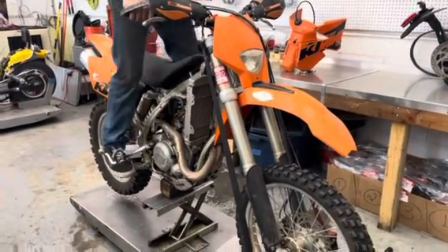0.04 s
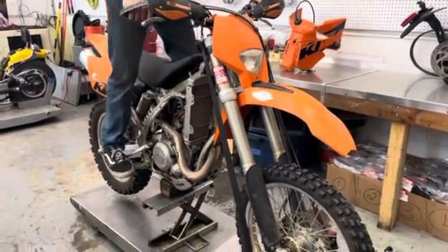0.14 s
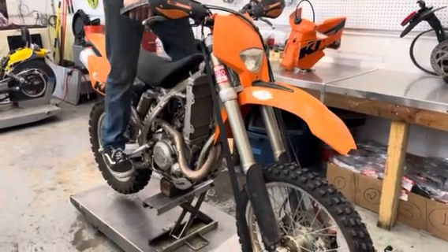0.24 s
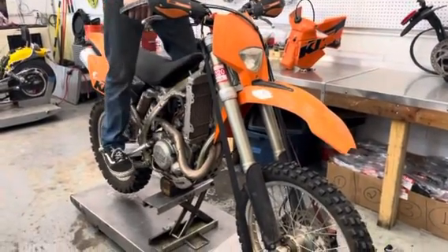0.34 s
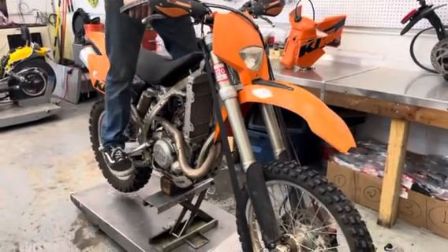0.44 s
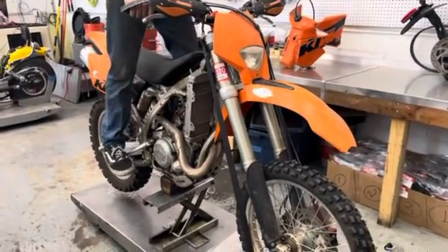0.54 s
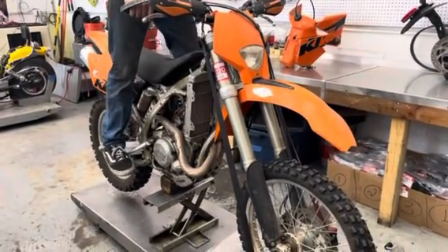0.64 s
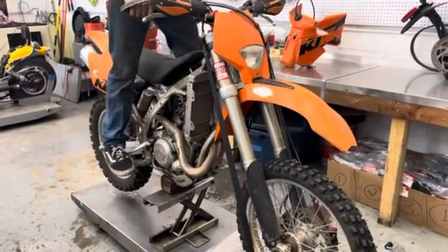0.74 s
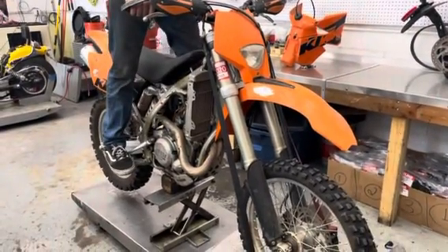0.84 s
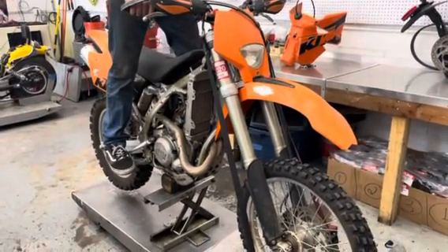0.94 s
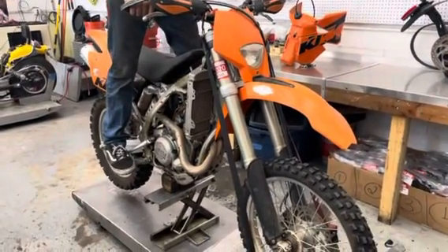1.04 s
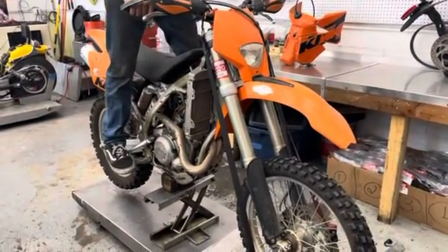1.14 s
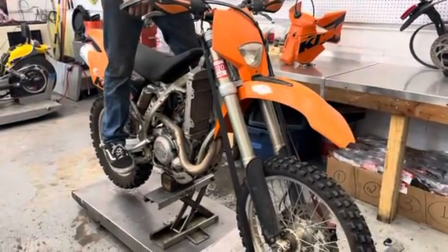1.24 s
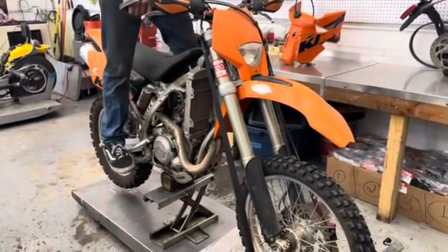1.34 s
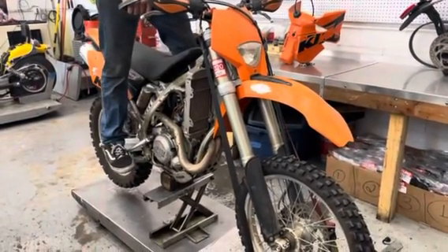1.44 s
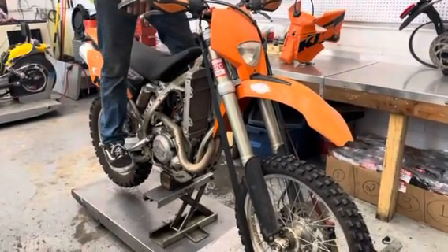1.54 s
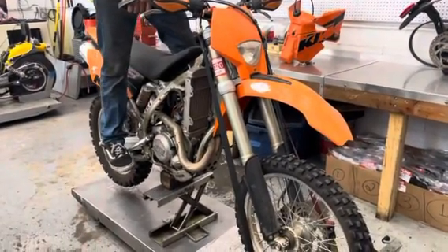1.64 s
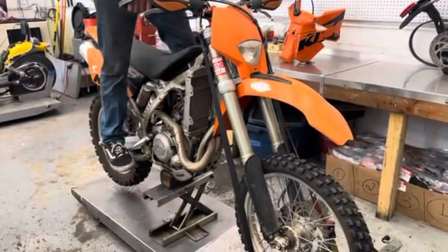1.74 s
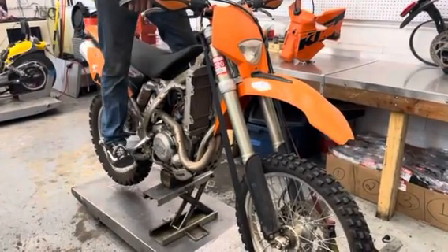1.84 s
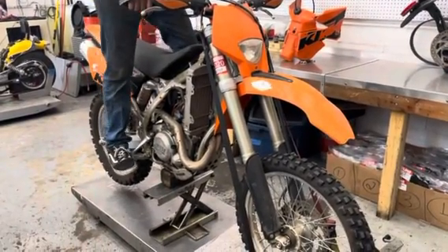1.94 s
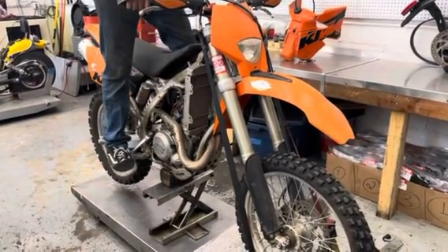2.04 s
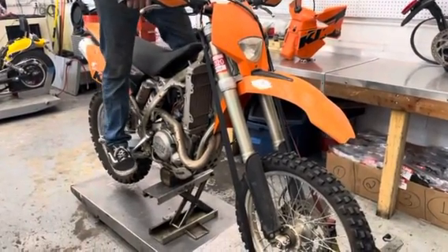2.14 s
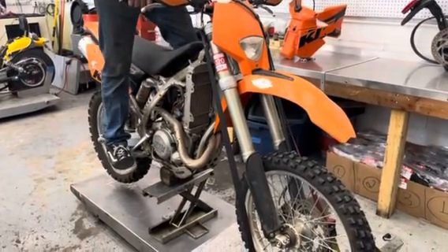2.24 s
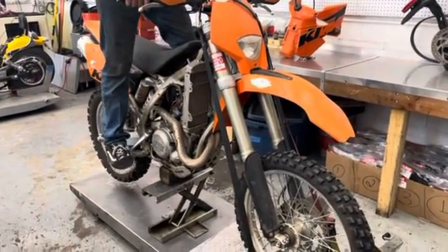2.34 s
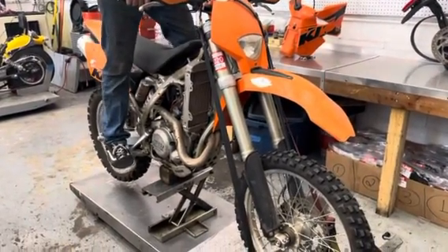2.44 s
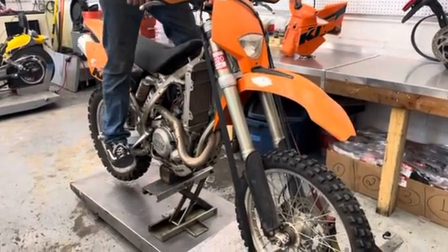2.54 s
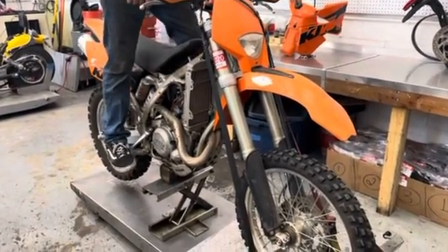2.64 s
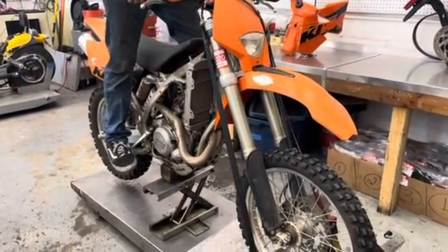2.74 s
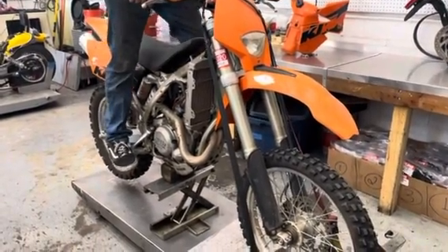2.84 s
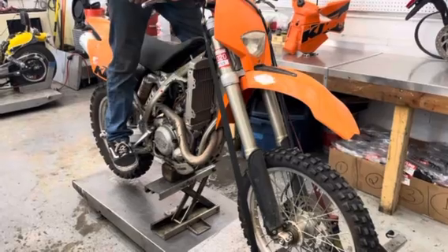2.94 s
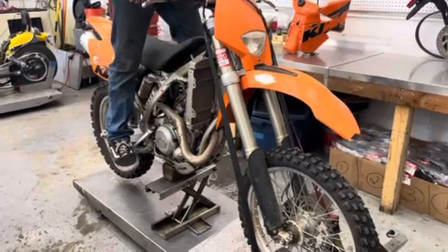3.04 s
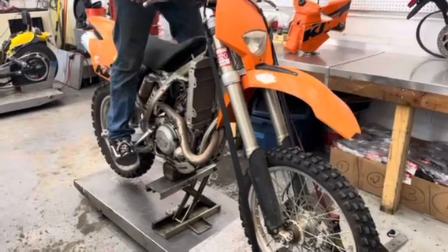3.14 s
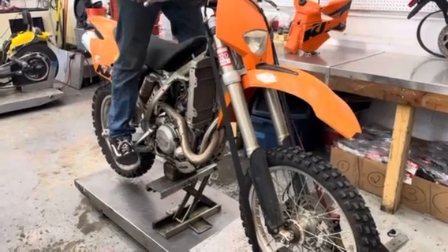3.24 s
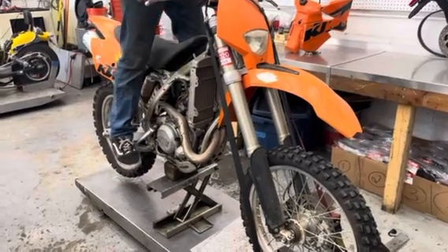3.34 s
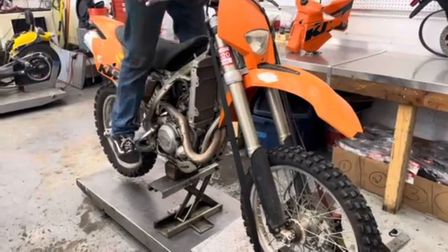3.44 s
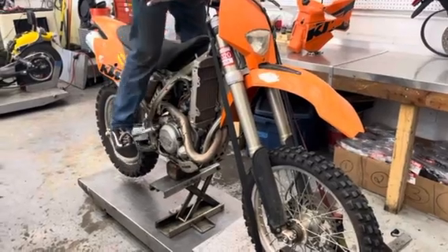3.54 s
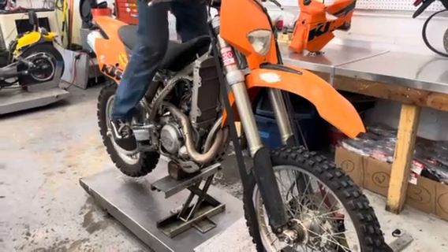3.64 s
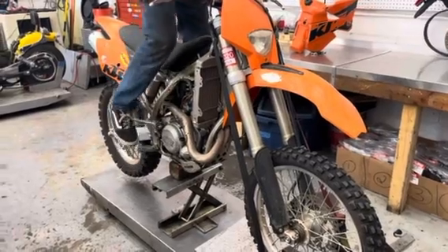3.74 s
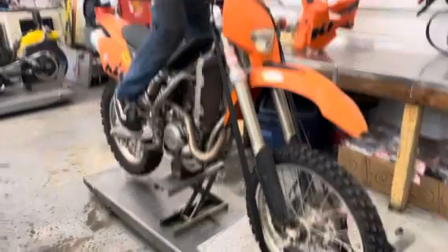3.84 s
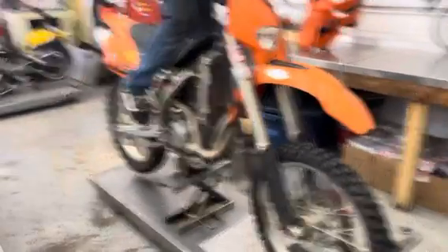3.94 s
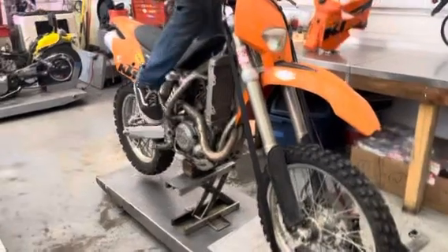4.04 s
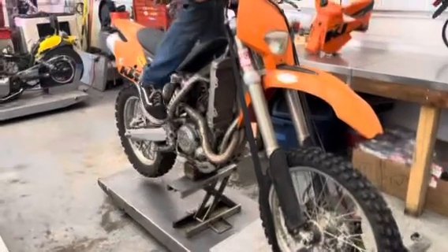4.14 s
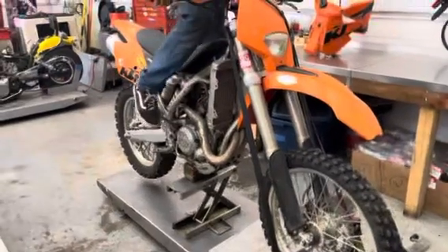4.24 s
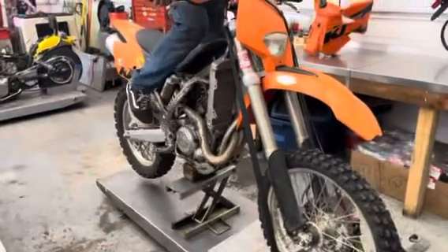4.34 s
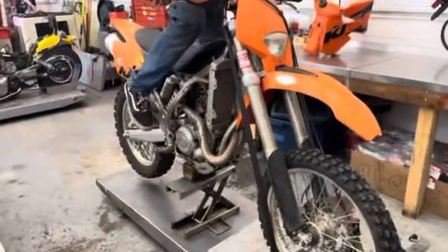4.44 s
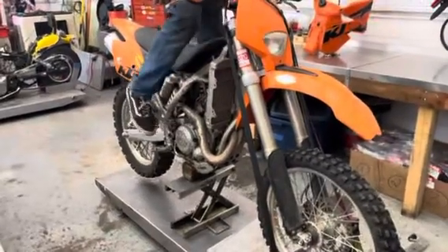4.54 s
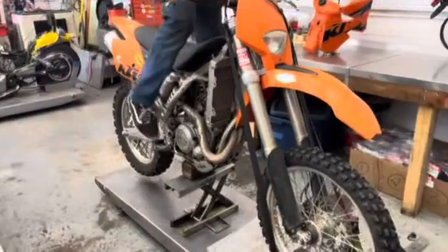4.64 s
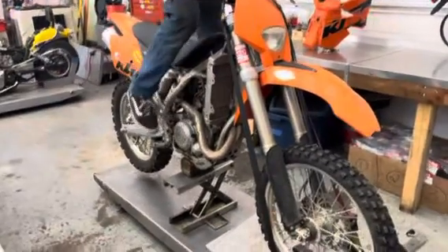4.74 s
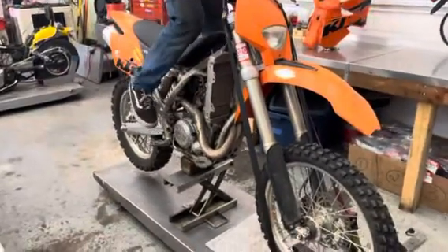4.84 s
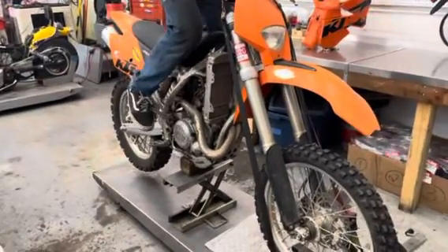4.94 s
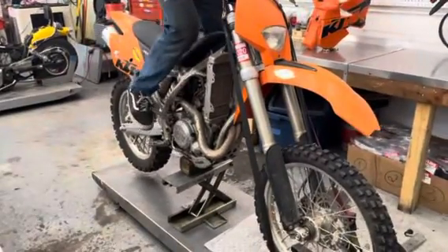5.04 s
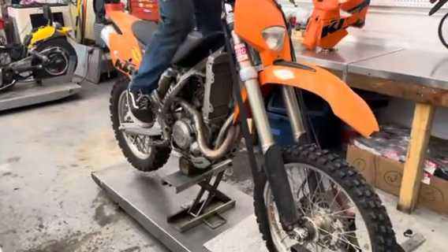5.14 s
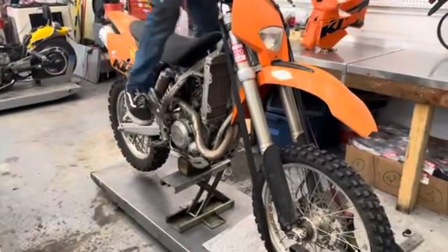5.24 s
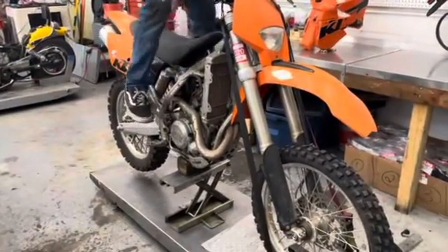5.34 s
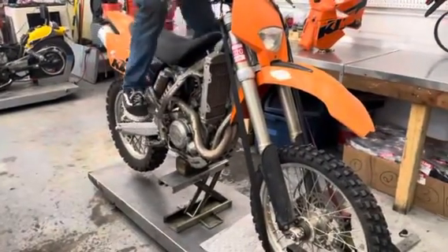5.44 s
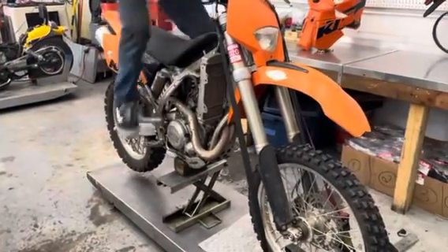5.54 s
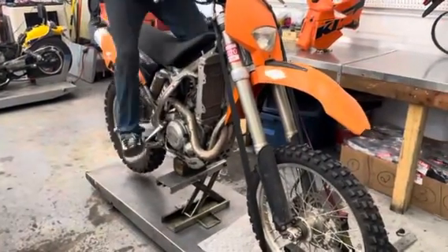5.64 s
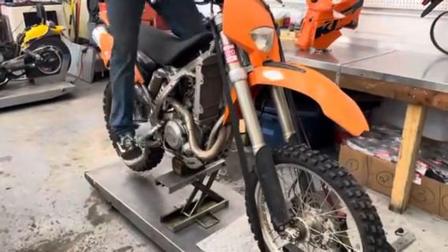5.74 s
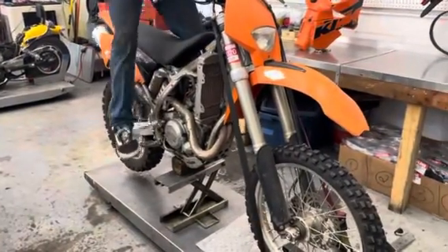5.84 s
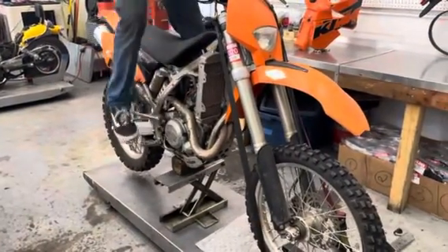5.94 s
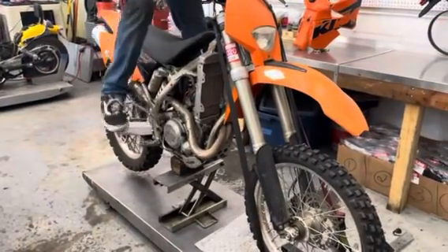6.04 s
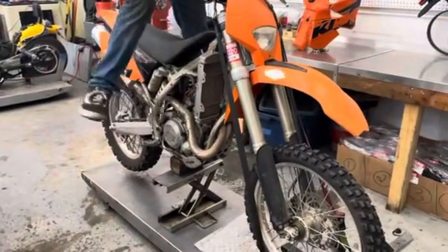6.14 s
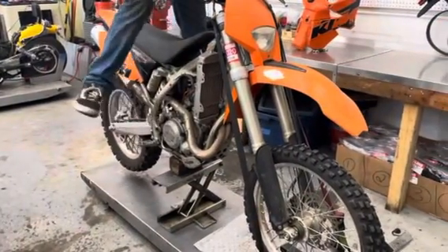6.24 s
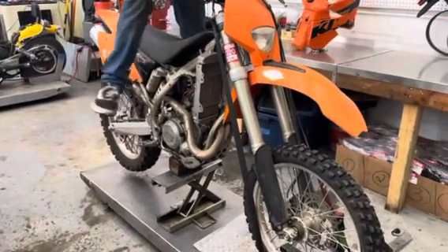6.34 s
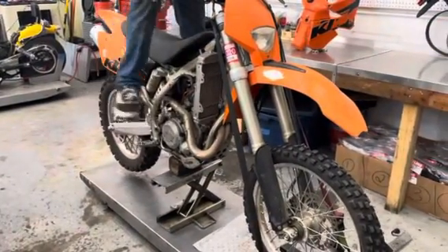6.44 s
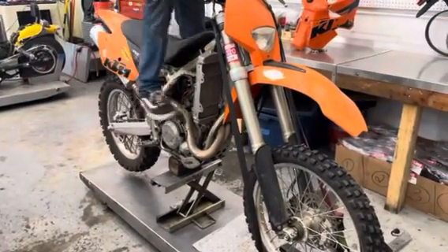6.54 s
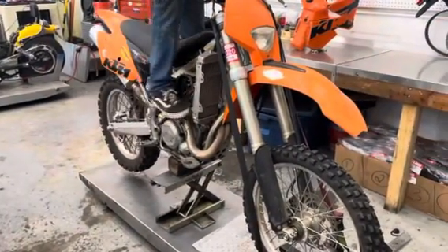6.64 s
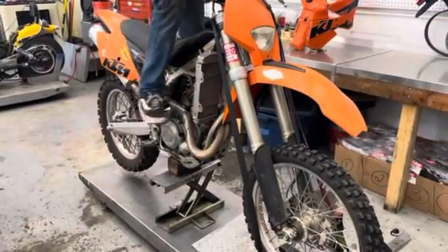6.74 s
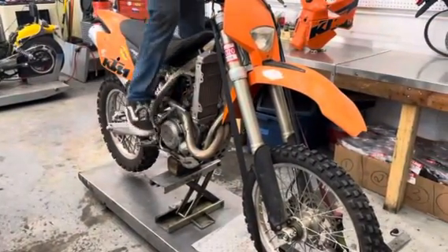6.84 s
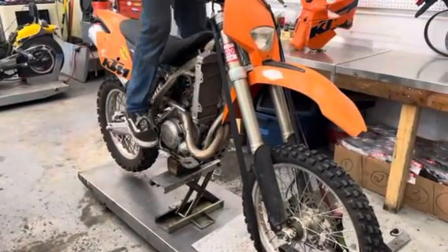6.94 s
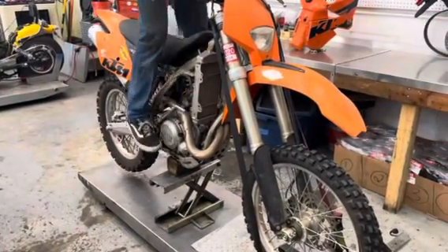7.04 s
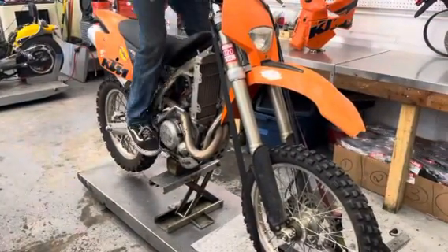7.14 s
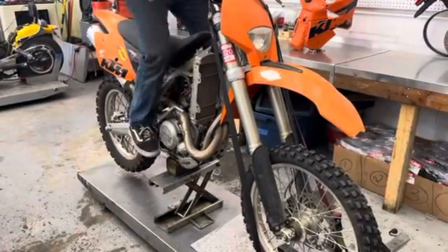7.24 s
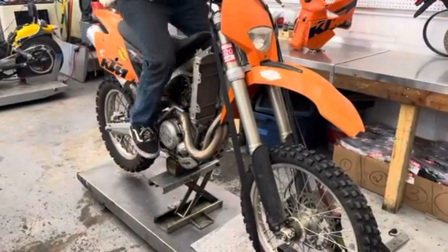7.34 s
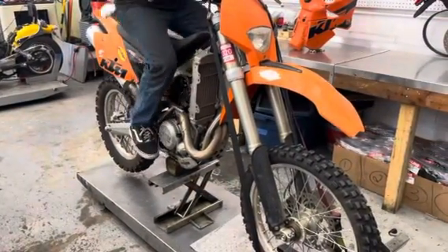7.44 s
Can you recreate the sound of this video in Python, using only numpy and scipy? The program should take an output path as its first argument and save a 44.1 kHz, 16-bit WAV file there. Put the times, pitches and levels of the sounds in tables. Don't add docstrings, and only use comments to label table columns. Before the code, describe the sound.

A reverberant workshop with a steady low compressor hum, faint mains buzz and soft air noise, heard on a close handheld stereo microphone. The tail of an earlier blow dies away at the start. Around 0.3 s a lever folds out with a few quick, light clanks. Low air puffs flutter on the microphone from 1.1 to 1.6 s. At 1.9 s the lever hits its stop with a loud, hard double clack and dull knock, ringing in the room. More puffs come near 3.1-3.4 s, then thin ratchet clicks from 3.5 s, stronger bites at 3.9 and 4.3 s. At 5.6 s a heavy kick thuds and cracks; the single-cylinder four-stroke catches immediately, rough and clattering, quickening to about 24 firings per second by 6.2 s. It sags into slow, uneven, separate thumps near 7.1 s, then barks harder and revs upward until the cut at about 7.5 s.

```python
import sys
import numpy as np
from scipy import signal
from scipy.fft import rfft, irfft, next_fast_len
from scipy.io import wavfile
from scipy.ndimage import uniform_filter1d

SR = 44100
rng = np.random.default_rng(int(sys.argv[2]) if len(sys.argv) > 2 else 0)


def generate_wav(sig):
    pcm = np.round(np.clip(np.atleast_2d(sig).T, -1, 1) * 32767).astype(np.int16)
    wavfile.write(sys.argv[1], SR, pcm)


def nominal_scale(level):
    x = np.asarray(level, float) / 20
    return 10 ** x


N = 330750
PAD = next_fast_len(N + 2 * SR)
HZ = np.arange(PAD // 2 + 1) * SR / PAD + 1e-3

# [multiple of compressor shaft speed, level/dB
# before the listener moves, level/dB after]
HUM = [(1, -56, -57.5), (2, -57, -60), (4, -47, -42.5), (5, -60, -57), (7.33, -51, -57), (8, -50, -59),
       (9, -58, -55.5), (11, -56, -54), (12, -51, -52.5), (13, -57, -53.5), (16, -65, -57), (18, -62, -59),
       (20, -63, -58), (21, -59, -62)]
MOTOR_HZ, MOTOR_SAG_HZ_PER_S = 47.84, .11
MAINS_HZ, MAINS_DB = 120.1, -53
# [t/s, share of the way]
SHIFT = [(1.1, 0), (1.9, 1)]
# [t/s, share]
TURN_AWAY = [(3.6, 0), (5.0, 1)]
TURN_DB_PER_MULTIPLE = -.28
# [f/Hz, density/dB per Hz]
AIR = [(20, -69), (45, -11.5), (120, -12.5), (160, -18), (250, -13.5), (400, -16), (600, -17), (1200, -15),
       (2700, -24.5), (5000, -38), (7900, -51), (11000, -52), (13500, -58), (15500, -76)]
AIR_DB = -45
# [t/s, level/dB]
STIRS = [
    (.28, 0.72),
    (1.901, 13.7),
    (3.6, 1.2),
]
STIR_S = 0.12
EARLIER_BLOW_DB = -35.5

# [f/Hz, left lead/rad]
PORT_PHASE = [(0, 0), (1290, -0.4), (2760, 0.8), (3190, 1.8), (4220, 0.9), (5080, 0.4), (5600, -0.8),
              (6630, -1.1), (7670, -3.14), (9560, -3.14), (10500, -6.2), (13700, -6.4), (14300, -9.42),
              (16000, -9.42)]
# [f/Hz, left minus right/dB]
PORT_BALANCE = [(60, -0.9), (700, -2), (1290, -7), (2380, -1), (4400, 12.5), (7600, 0.5), (15000, 5)]
# [f/Hz, left minus right/dB]
LEVER_SIDE = [(5500, 1), (7800, 6), (16000, -7)]
# [f/Hz, left-right likeness]
LIKENESS = [(60, 0.99), (130, 0.65), (290, 0.64), (640, 0.043), (1400, 0.011), (4000, 0.28), (6800, 0.3),
            (7700, 1)]
FLICKER_SHARE, FLICKER_SWING_DB, FLICKER_S = 0.15, 11.5, 0.048
# [f/Hz, T60/s]
ROOM_T60 = [(100, 0.69), (1000, 1), (4000, 0.61), (12000, 0.55)]
# [f/Hz, level/dB]
ROOM_COLOUR = [(60, -5.5), (250, -6.5), (1000, 0), (5000, -1.5), (9000, -19.5), (16000, -9)]

# [t/s, peak level/dB]
PUFFS = [(0.053, -30), (1.123, -32), (1.168, -25.5), (1.232, -25), (1.271, -26), (1.306, -34),
         (1.332, -30.5), (1.393, -22), (1.451, -21.5), (1.491, -26), (1.546, -27.5), (1.606, -28.5),
         (3.126, -25), (3.158, -30), (3.183, -30), (3.26, -33), (3.289, -34), (3.312, -28), (3.35, -32),
         (3.401, -32), (5.524, -39), (5.55, -22), (5.586, -26)]
PUFF_HZ, PUFF_SPREAD, FLUTTER_DB = 80, 0.14, -8
SHUDDER_S, SHUDDER_GAP_S, SHUDDER_DB, SHUDDER_HZ = 2.1, .046, -30, 152
# [t/s, peak level/dB, f/Hz,
# scuff/ms]
KNOCKS = [(0.029, -26.5, 226, 8.6), (1.223, -39, 207, 62), (1.43, -31.5, 238, 7.3), (1.93, -16.5, 241, 20),
          (1.959, -28.5, 164, 35), (2.172, -33.5, 187, 42), (3.85, -31, 142, 9.6), (3.872, -23.5, 590, 7.8),
          (3.891, -20.5, 574, 3), (5.538, -25, 97, 11), (5.646, -10, 204, 11)]

# [f/Hz, level/dB, T60/s]
LEVER = [(1100, -5, .04), (1300, 0, .05), (1520, -5, .03), (1950, -8, .03), (2550, -3, .025),
         (3780, -8, .02), (4700, -10, .02)]
LEVER_DAMPING = .8
# [t/s, peak level/dB, loudest ring f/Hz]
PIVOT = [
    (0.2745, -25.5, 2700),
    (.2764, -24.5, 4470),
    (0.29, -23, 2700),
    (0.31, -29, 2780),
]
STOP = [
    (1.886, -11, 1300),
    (1.917, -10, 2840),
    (1.985, -20.5, 2680),
]
PAWL = [(3.530, -33, 4280), (3.6057, -28, 4300), (3.668, -29, 4380), (3.724, -32, 4230),
        (3.7802, -29, 4220), (3.821, -37.5, 2710), (3.834, -34, 4200), (3.89, -27.5, 4160),
        (4.021, -36.5, 3520), (4.298, -38, 4170)]
BITE = [
    (3.938, -23.5, 3700),
    (4.332, -23, 4030),
]
KICK = [
    (5.585, -30, 4200),
    (5.618, -5.5, 2240),
]
# [rattle/ms, crack low edge f/Hz, room level/dB, ring level/dB, top level/dB]
PARTS = [
    (7.1, 1640, 9, -14, -22),
    (4.3, 1070, 4.5, -14.5, -19.5),
    (7.7, 1900, 5, -20.5, -39),
    (3.9, 2000, 5, -18, -23),
    (4.2, 2000, 7, -35, -15.5),
]
ROUGH_SHARE = .3

# [t/s, rate/firings per s]
SPEED = [(5.671, 15.35), (5.95, 20.32), (6.2, 24.21), (6.48, 22.53), (6.79, 19.39), (6.85, 16.66),
         (7.1, 13.29), (7.28, 16.75), (7.5, 34.87)]
# [t/s, level/dB above steady idle]
LOAD = [(5.42, -38), (5.54, -19.5), (5.61, -4), (5.66, 3), (5.95, 0), (6.25, -1.5), (6.6, -3), (6.9, -5.5),
        (7.05, -6), (7.15, -3), (7.21, 0), (7.27, 4), (7.33, 6), (7.5, 2.5)]
# [t/s, thump/dB, bark/dB]
UNEVEN = [(5.67, 1.5, -5.5), (5.73, 3, -17), (5.79, 0, -12), (5.85, -1, -0.5), (5.9, 3, -5), (5.95, -6, -8),
          (6.0, 5, -1.5), (6.13, 4.5, -14), (6.22, 2.5, 1.5), (6.48, -3, -12), (6.52, 3, 2),
          (6.66, -26, -5), (6.71, 3, 3.5), (6.81, -9, -1), (7.0, -24, -14), (7.07, 3, 6.5), (7.14, 1, -30),
          (7.27, 2.5, -6.5), (7.48, -17, 2.5)]
THUMP_DB, THUMP_FOLLOWS = -14.5, 0.21
THUMP_FADES_ABOVE_HZ, THUMP_FADE_DB_PER_HZ = 23.2, 2.2
BARK_DB, BARK_FOLLOWS, FIRING_SCATTER_DB = -13.5, 1.66, 2.5
# [idle level/dB, share of load swing, extra/dB at the catch]
LAYERS = [
    (-19, 0.99, 1),
    (-26, 0.72, -2.5),
    (-26, 1, 2.5),
]
CATCH_S, SETTLE_S = 5.8, 0.097
# [t/s, level/dB]
FRAME_SHAKE = [(4.8, -64), (5.1, -39.5), (5.5, -44), (5.7, -27), (6.4, -42), (6.7, -25), (7.5, -26.5)]
# [share of cycle, level/dB]
VALVE_GEAR = [(.04, 1.5), (.3, -3.5), (.55, -6), (.8, 10.5)]
# [f/Hz, width/Hz, level/dB]
CASING = [(1300, 148, 2.5), (1615, 105, -2), (1884, 35, -14), (2810, 140, -6.5), (3800, 110, -6.5),
          (4160, 210, -10)]
# [f/Hz, density/dB per Hz]
RUNNING_COLOUR = [(100, -37), (194, -8.5), (437, -19), (780, -22.5), (1320, -22), (1810, -31.5),
                  (2500, -27.5), (3770, -33), (6050, -40.5), (8520, -42.5), (10200, -43), (13700, -55),
                  (15300, -47), (16400, -72)]
# [f/Hz, width/Hz, level/dB]
MUFFLER = [(92.3, 17.4, 6), (105, 88, -9.5), (67.4, 42, -12.5), (38.6, 42, -37)]
MUFFLER_LAG_S = .008
# [f/Hz, width/Hz, level/dB]
HEADER = [(174.4, 29, -4), (240, 5.7, 2), (316, 25, -2), (427, 9.7, -1), (557, 53, -12.5)]


def rms_one(x):
    return x / np.sqrt(np.mean(x ** 2) + 1e-20)


def read(rows, t_s):
    return np.interp(t_s, *np.transpose(rows))


def held(times_s, values):
    at = np.clip(np.searchsorted(times_s, np.arange(N) / SR) - 1, 0, len(times_s) - 1)
    return uniform_filter1d(np.asarray(values)[at], size=300)


def at_hz(points, hz=HZ):
    table_hz, values = np.transpose(points)
    return np.interp(np.log(hz), np.log(np.maximum(table_hz, 1)), values)


def shaped(x, response):
    return irfft(rfft(x, PAD) * response, PAD)[..., :N]


def band(x, low_hz, high_hz):
    return signal.sosfilt(signal.butter(2, [low_hz, high_hz], "band", fs=SR, output="sos"), x)


def ring(x, hz, t60_s):
    r, w = nominal_scale(-60 / (t60_s * SR)), 2 * np.pi * hz / SR
    return signal.lfilter([0, np.sin(w)], [1, -2 * r * np.cos(w), r * r], x + 1e-18)


def resonance(x, hz, width_hz):
    r = np.exp(-np.pi * width_hz / SR)
    poles = [1, -2 * r * np.cos(2 * np.pi * hz / SR), r * r]
    return signal.lfilter([(1 - r * r) / 2, 0, (r * r - 1) / 2], poles, x + 1e-18)


def add(track, t_s, sound):
    at = max(round(t_s * SR), 0)
    track[at:at + len(sound)] += sound[:N - at]


def diffuse(mid, side):
    alike = np.clip(at_hz(LIKENESS), 0, 1)
    mid = shaped(mid, np.sqrt((1 + alike) / 2))
    side = shaped(side, np.sqrt((1 - alike) / 2))
    return np.array([mid + side, mid - side])


def compressor():
    t = np.arange(N) / SR
    turns = MOTOR_HZ * t - MOTOR_SAG_HZ_PER_S * t ** 2 / 2
    moved, turned = read(SHIFT, t), read(TURN_AWAY, t)
    out = nominal_scale(MAINS_DB) * np.sin(2 * np.pi * MAINS_HZ * t)
    for (multiple, before_db, after_db), phase in zip(HUM, rng.random(len(HUM))):
        level_db = before_db + (after_db - before_db) * moved + TURN_DB_PER_MULTIPLE * multiple * turned
        out += nominal_scale(level_db) * np.sin(2 * np.pi * (multiple * turns + phase))
    return np.sqrt(2) * nominal_scale(0.1) * out


def air():
    noise = diffuse(*shaped(rng.standard_normal((2, N)), nominal_scale(at_hz(AIR))))
    level = np.sqrt(np.mean(band(noise, 700, 4000) ** 2))
    t = np.arange(N) / SR
    stirred_db = sum(db * (t > s) * np.exp(-np.abs(t - s) / STIR_S) for s, db in STIRS)
    return noise / level * nominal_scale(AIR_DB + stirred_db + 1.5)


def earlier_blow():
    noise = band(rng.standard_normal((2, N)), 160, 2550)
    return rms_one(diffuse(*noise)) * nominal_scale(EARLIER_BLOW_DB - 60 * np.arange(N) / SR / 0.76)


def workshop(x):
    t = np.arange(int(1.3 * SR)) / SR
    white = rng.standard_normal((2, len(t)))
    tail = 0
    for low_hz in 40 * 2. ** np.arange(9):
        t60_s = at_hz(ROOM_T60, 1.41 * low_hz)
        tail = tail + band(white, low_hz, 2 * low_hz) * nominal_scale(-60 * t / t60_s)
    tail = tail * (1 - np.exp(-t / 0.0022))
    tail = tail / np.sqrt(np.sum(tail ** 2) / 2)
    return diffuse(*shaped(x, rfft(tail, PAD) * nominal_scale(at_hz(ROOM_COLOUR))))


def shading(x, balance=PORT_BALANCE):
    shade = nominal_scale(at_hz(balance) / 2)
    return shaped(x, np.array([shade, 1 / shade]))


def ports(x):
    turn = np.exp(.5j * np.interp(HZ, *np.transpose(PORT_PHASE)))
    return shaped(x, np.array([turn, 1 / turn]))


def treble_flicker(x):
    knots_s = np.arange(300) * FLICKER_S
    slow, side = [np.interp(np.arange(N) / SR, knots_s, own) for own in rng.standard_normal((2, 300))]
    lean = np.clip(FLICKER_SHARE * nominal_scale(FLICKER_SWING_DB * slow), 0, .5) * np.tanh(2 * side)
    return x + band(x, 5100, 16000) * lean * np.array([[1], [-1]])


def puffs():
    out, t = np.zeros(N), np.arange(-SR // 20, SR // 20) / SR
    own = rng.standard_normal((len(PUFFS), 2))
    rows = [(s, db, PUFF_HZ * np.exp(PUFF_SPREAD * o), 2 * p) for (s, db), (o, p) in zip(PUFFS, own)]
    rows += [(SHUDDER_S + k * SHUDDER_GAP_S, SHUDDER_DB, SHUDDER_HZ, k) for k in range(3)]
    for s, db, hz, phase in rows:
        swell = np.exp(-(t * hz / 0.8) ** 2)
        add(out, s + t[0], nominal_scale(db) * swell * np.cos(2 * np.pi * hz * t + phase))
    gust = np.sqrt(np.abs(uniform_filter1d(out ** 2, size=4000)))
    return out + nominal_scale(FLUTTER_DB) * gust * rms_one(band(rng.standard_normal(N), 54, 198))


def knocks():
    out, t = np.zeros(N), np.arange(SR // 4) / SR
    for s, db, hz, scuff_ms in KNOCKS:
        envelope = np.exp(-t * 1000 / scuff_ms) * np.tanh(t * 3000 / scuff_ms)
        scuff = rng.standard_normal(len(t)) * envelope
        sound = rms_one(ring(scuff, hz, 6.5 / hz)) + nominal_scale(-4) * rms_one(band(scuff, hz, 2.44 * hz))
        add(out, s, nominal_scale(db) * sound / np.max(np.abs(sound)))
    return out


def contacts():
    out, sent, t = np.zeros(N), np.zeros(N), np.arange(int(.15 * SR)) / SR
    click = 1. * (t == 0)
    tables = [PIVOT, STOP, PAWL, BITE, KICK]
    hits = [(*hit, *part) for table, part in zip(tables, PARTS) for hit in table]
    for s, db, hz, rattle_ms, low_hz, room_db, ring_db, top_db in hits:
        rattle = rng.standard_normal(len(t)) * np.exp(-t * 1000 / rattle_ms)
        rattle = rattle * (1 - np.exp(-t / 0.0037))
        modes = 0
        for (mode_hz, level_db, t60_s), own in zip(LEVER, rng.standard_normal(len(LEVER))):
            modes = modes + nominal_scale(level_db + 0.42 * own) * ring(rattle, mode_hz, LEVER_DAMPING * t60_s)
        crack = band(nominal_scale(-26.5) * modes + rattle, low_hz, 6100)
        broad = crack + nominal_scale(top_db) * band(rattle, 4200, 15900)
        hit = broad + nominal_scale(ring_db) * ring(rattle, hz, 0.0072)
        gain = nominal_scale(db) / np.max(np.abs(hit))
        add(out, s, gain * hit)
        even = band(click, low_hz, 6400) + nominal_scale(-25) * ring(click, hz, .01)
        add(sent, s, gain * nominal_scale(room_db) * (rms_one(even) * np.std(broad) + ROUGH_SHARE * broad))
    return out, sent


def firings():
    running_hz = read(SPEED, np.arange(N) / SR) * (np.arange(N) >= SPEED[0][0] * SR)
    cycles = np.cumsum(running_hz) / SR
    s = np.searchsorted(cycles, np.arange(int(cycles[-1]) + 1), side="right") / SR
    own_db = FIRING_SCATTER_DB * rng.standard_normal((len(s), 2))
    for at_s, *db in UNEVEN:
        own_db[np.argmin(np.abs(s - at_s))] = db
    load_db = read(LOAD, s)
    fade_db = THUMP_FADE_DB_PER_HZ * np.maximum(read(SPEED, s) - THUMP_FADES_ABOVE_HZ, 0)
    thump_db = THUMP_DB + THUMP_FOLLOWS * load_db - fade_db + own_db[:, 0]
    bark_db = BARK_DB + BARK_FOLLOWS * load_db + own_db[:, 1]
    return np.transpose([s, thump_db, bark_db, own_db[:, 1]])


def layer_levels(times_s):
    t = np.arange(N) / SR
    load_db = np.where(t < times_s[0], read(LOAD, t), held(times_s, read(LOAD, times_s)))
    fresh = np.exp(-np.abs(t - CATCH_S) / SETTLE_S)
    return [db + follows * load_db + extra_db * fresh for db, follows, extra_db in LAYERS]


def rumble():
    return rms_one(band(rng.standard_normal(N), 33.5, 94)) * nominal_scale(read(FRAME_SHAKE, np.arange(N) / SR))


def tappets(times_s, scatter_db):
    share, db = np.transpose(VALVE_GEAR)
    at = ((times_s[:-1, None] + share * np.diff(times_s)[:, None]) * SR).astype(int).ravel()
    contact_db = np.tile(db, len(times_s) - 1)
    out = np.zeros(N)
    for hz, width_hz, ring_db in CASING:
        clicks = np.zeros(N)
        clicks[at] = nominal_scale(contact_db + ring_db + scatter_db * rng.standard_normal(len(at)))
        out += ring(clicks, hz, 2.1 / width_hz)
    return rms_one(out) * nominal_scale(layer_levels(times_s)[1] - 12.5)


def running(firing, pulse_db, grain_db, colour_db):
    times_s = firing[:, 0]
    fired = np.zeros(N)
    fired[(times_s * SR).astype(int)] = nominal_scale(0.36 * firing[:, 3])
    pulse = signal.lfilter([1], [1, -np.exp(-1 / (0.012 * SR))], fired)
    swell = nominal_scale(pulse_db * uniform_filter1d(pulse, size=500))
    grain = nominal_scale(grain_db * rms_one(band(rng.standard_normal(N), 69, 670)))
    noise = shaped(rng.standard_normal(N) * grain * swell, nominal_scale(at_hz(RUNNING_COLOUR)))
    casing = 0
    for hz, width_hz, db in CASING:
        own_db = colour_db * rng.standard_normal(len(firing))
        casing = casing + nominal_scale(db + held(times_s, own_db)) * resonance(noise, hz, width_hz)
    noise = noise + casing
    out = np.zeros(N)
    trims_db = [-5.0, -4.0, -4.0]
    for (low, mid, top), level_db, trim_db in zip(np.eye(3), layer_levels(times_s), trims_db):
        share = at_hz([(500, low), (900, mid), (1700, mid), (2400, top)])
        out += rms_one(shaped(noise, share)) * nominal_scale(level_db + trim_db)
    return out * (np.arange(N) > LOAD[0][0] * SR)


def exhaust(fired):
    thump, bark = np.zeros(N), np.zeros((len(HEADER), N))
    order = np.arange(len(HEADER))
    for s, thump_db, bark_db, _ in fired:
        own_db = 1.9 * rng.standard_normal(len(HEADER))
        bright_db = 0.12 * (bark_db + 31.5) * order
        thump[round((s + MUFFLER_LAG_S) * SR)] = nominal_scale(thump_db)
        bark[:, round(s * SR)] = -nominal_scale(bark_db + own_db + bright_db)
    low, high = np.zeros(N), np.zeros(N)
    for k, (hz, width_hz, db) in enumerate(MUFFLER):
        low += (-1) ** k * nominal_scale(db) * resonance(resonance(thump, hz, width_hz), hz, 2.05 * width_hz)
    for k, (hz, width_hz, db) in enumerate(HEADER):
        high += (-1) ** k * nominal_scale(db) * resonance(bark[k], hz, width_hz)
    return nominal_scale(53.0) * low + nominal_scale(39) * high


def scene():
    fired = firings()
    pipe = exhaust(fired) + rumble()
    clatter = running(fired, pulse_db=11.0, grain_db=1.5, colour_db=5.5)
    clatter = clatter + tappets(fired[:, 0], scatter_db=4.5)
    metal, metal_sent = contacts()
    dull = knocks()
    wet = workshop(nominal_scale(-8.5) * pipe + nominal_scale(1.5) * clatter + metal_sent + nominal_scale(3) * dull)
    direct = shading(pipe + clatter + shading(metal, LEVER_SIDE) + dull + compressor())
    return ports(direct + wet + air() + earlier_blow()) + puffs()


def roll_off(x):
    return signal.sosfilt(signal.butter(12, 16490, fs=SR, output="sos"), x)


def record(dry):
    rounded = 1.1 * np.tanh(treble_flicker(dry) / 1.1)
    return roll_off(rounded)


dry = scene()
out = record(dry)
generate_wav(out)
```